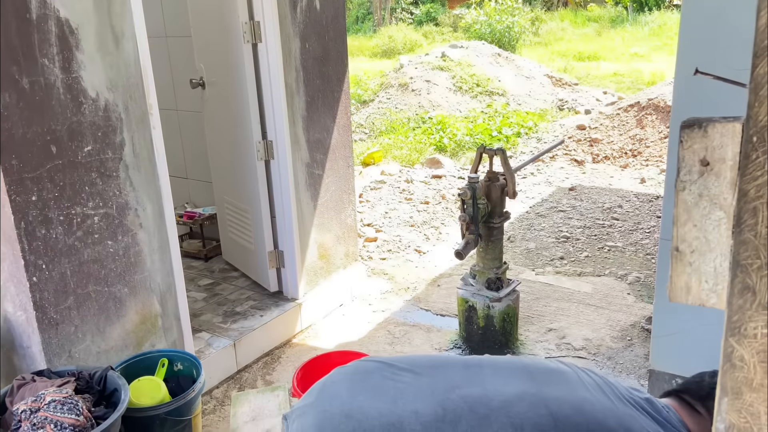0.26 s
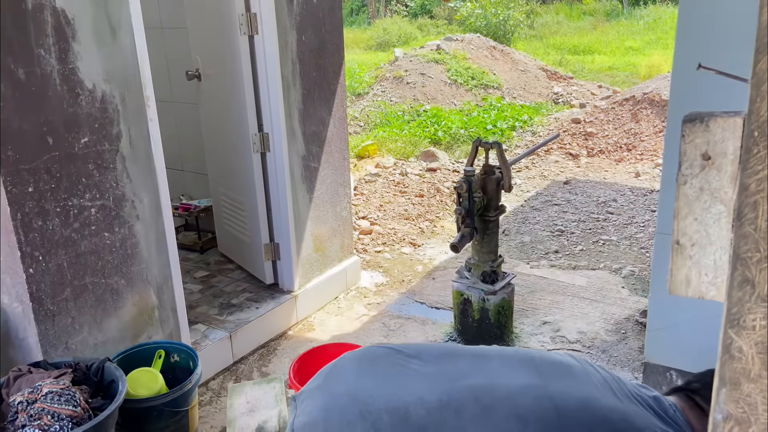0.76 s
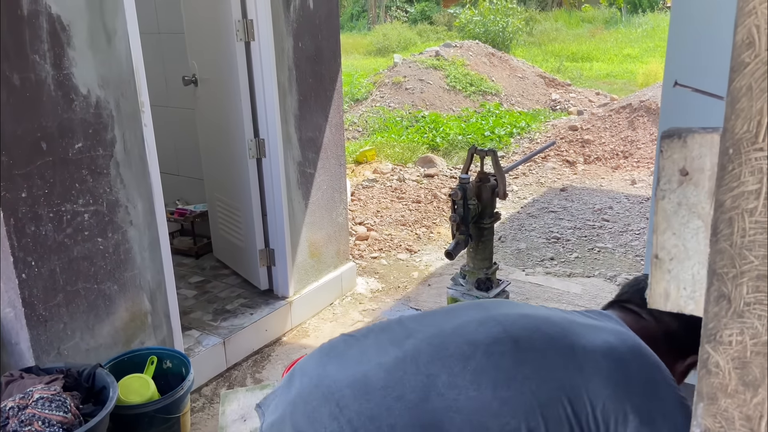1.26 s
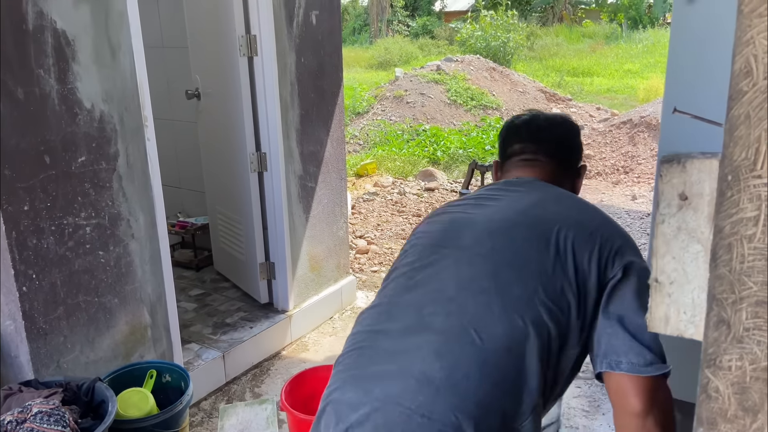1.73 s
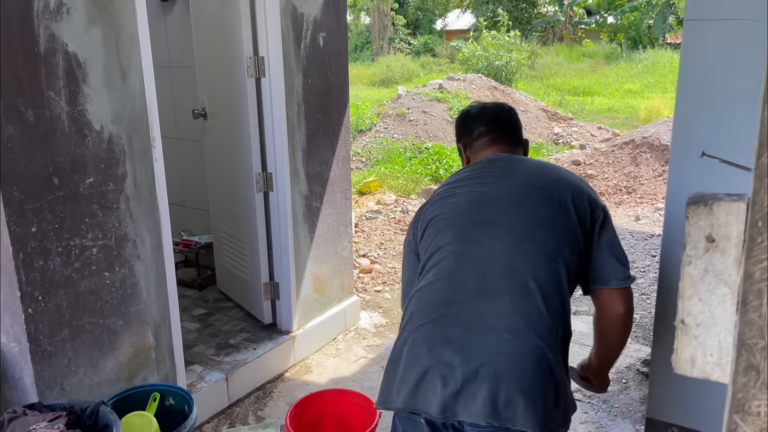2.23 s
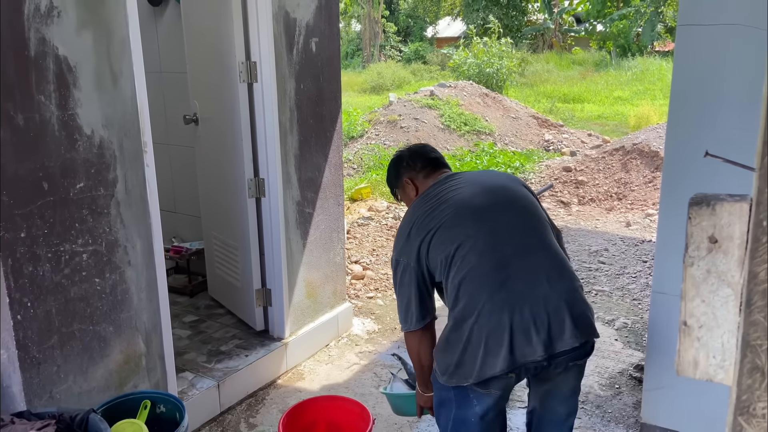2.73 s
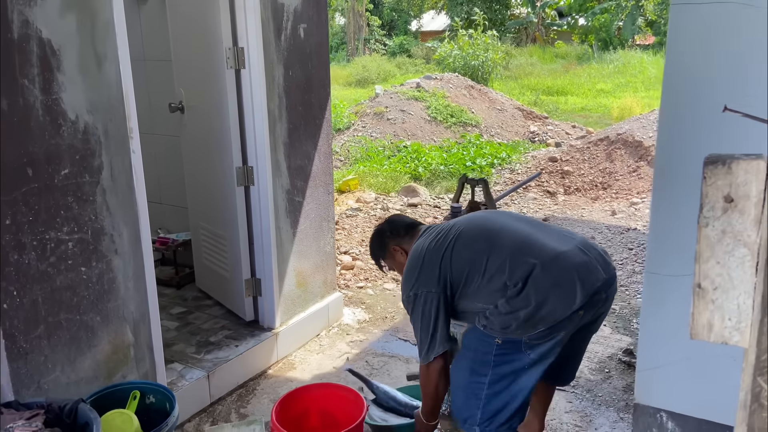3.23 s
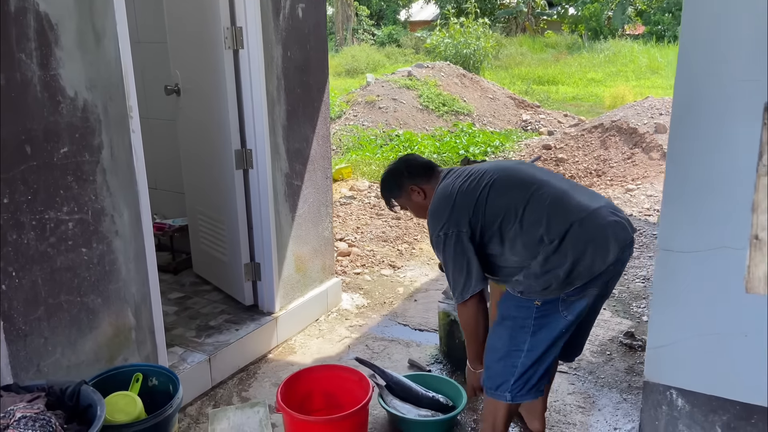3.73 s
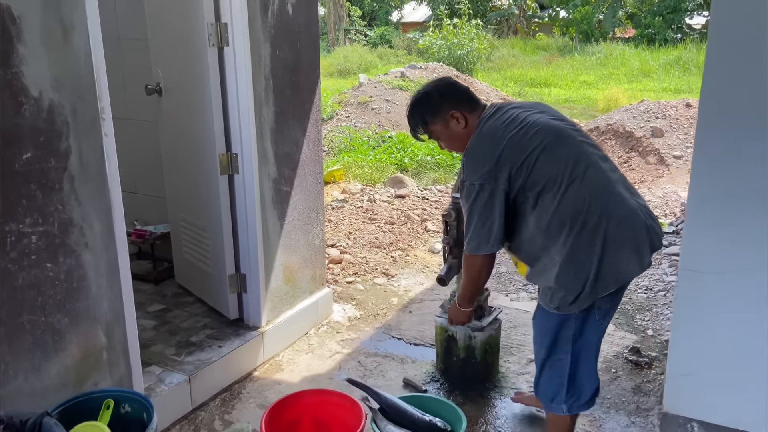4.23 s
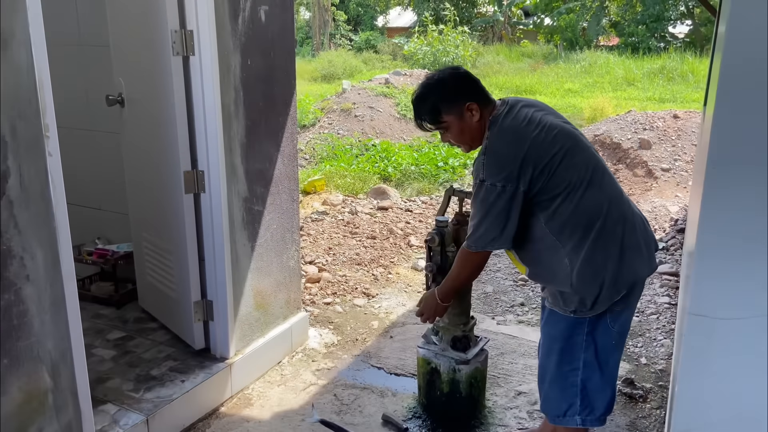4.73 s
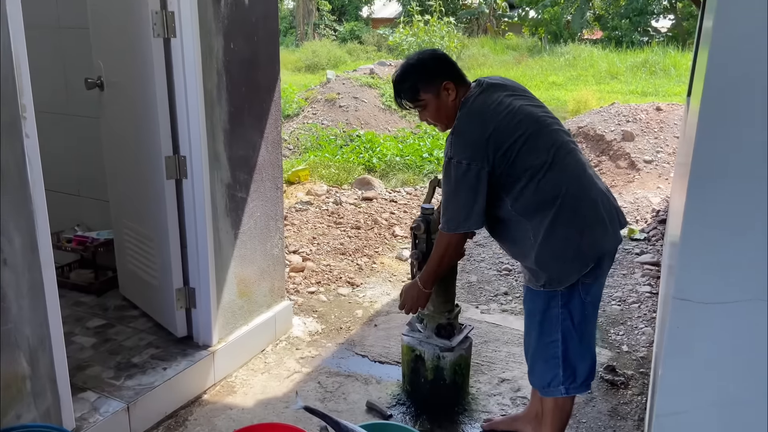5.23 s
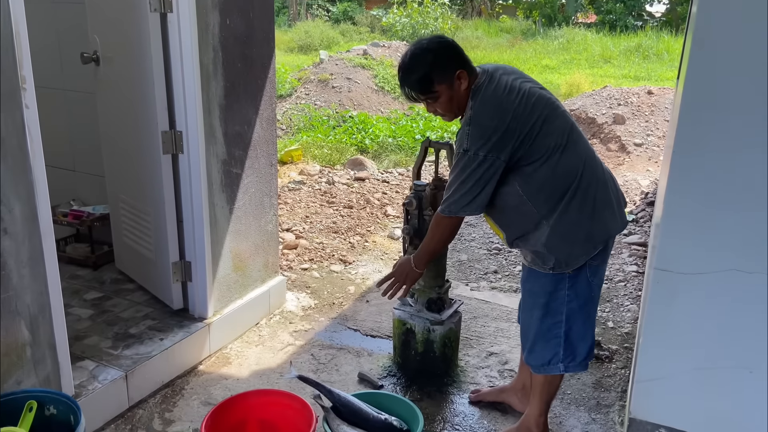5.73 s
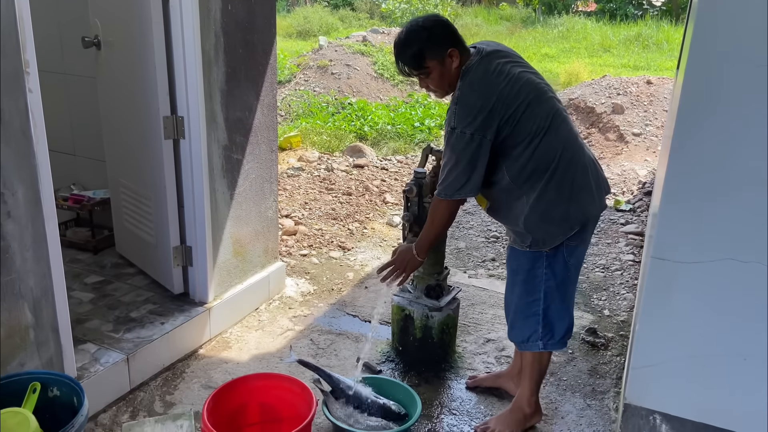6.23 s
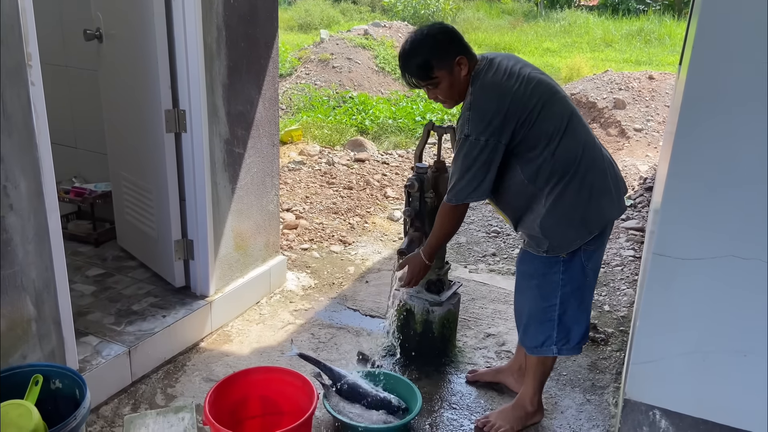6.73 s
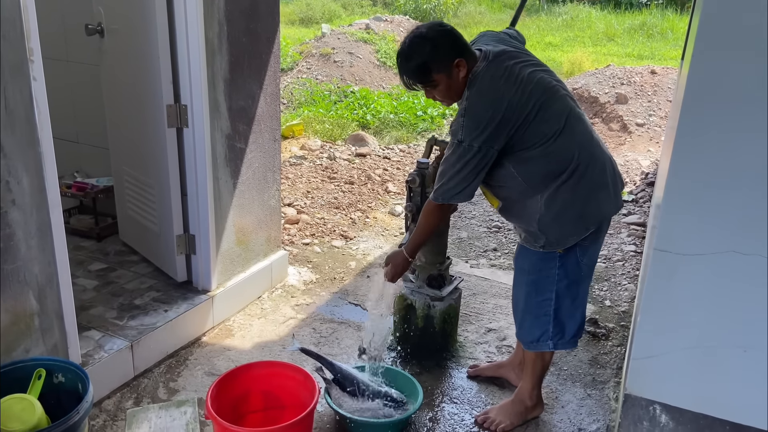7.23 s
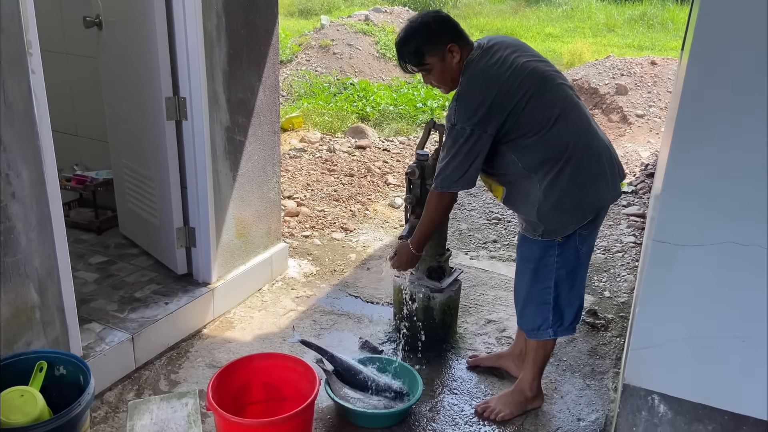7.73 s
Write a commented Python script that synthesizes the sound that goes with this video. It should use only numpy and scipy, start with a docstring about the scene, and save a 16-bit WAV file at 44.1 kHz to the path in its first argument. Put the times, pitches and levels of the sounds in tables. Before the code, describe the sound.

Chick peeps, a plastic basin knock and a skittering metal utensil give way to a clanking, squealing cast-iron hand pump gushing water onto concrete.

```python
"""A yard heard from a concrete porch: an engine drones far off throughout, two orders of its firing over rumble and hiss.
Wooden taps, scuffing feet and a nudged pot come first; chicks peep in arched whistles while birds call far off.
A plastic basin knocks its modes, a metal utensil skitters as grit keeps it ringing, a rooster crows in harmonics.
Then a cast-iron hand pump is worked: blows ring its linkage, gliding tones squeal and creak,
the barrel gulps in noise and bubbles, and water gushes onto the concrete in spray, slaps, drops and froth."""
import sys
import numpy as np
from scipy import signal
from scipy.fft import rfft, irfft, next_fast_len
from scipy.io import wavfile

SR = 44100
rng = np.random.default_rng(int(sys.argv[2]) if len(sys.argv) > 2 else 0)


def unload_audio(sound):
    """Save the sound as a 16-bit wav file, at the path given as the first command line argument."""
    columns = np.transpose(np.atleast_2d(sound))
    # keep every value between -1 and 1, then stretch to whole-number steps
    steps = np.round(np.clip(columns, -1, 1) * 32767)
    wavfile.write(sys.argv[1], SR, steps.astype(np.int16))


N = 351666
TIME = np.arange(N) / SR
SIDES = np.array([[1], [-1]])   # left, right

# Table levels are relative: each layer also has a gain of its own. t60 is the time to fall by 60 dB.
# iron striking iron in the linkage: [t/s, level/dB, ring over rattle/dB, brightness/(dB/octave), favoured mode f/Hz]
IRON_CLANKS = [(4.656, -30, -4.5, -2, 2820), (4.776, -33, -5, 5, 5490), (4.877, -19.5, 0, -2.5, 3750),
               (4.955, -19.5, -7, 2, 3750), (5.005, -33, -2, 6, 4030), (5.588, -12.5, -10.5, 1.5, 4430),
               (5.654, -20, -10, -2, 3750), (5.697, -17.5, -8.5, 10.5, 7170), (5.747, -17.5, -9, 2.5, 4430),
               (5.777, -20, -3.5, 8.5, 4430), (6.011, -21, 0, 2, 3750), (6.037, -14, -9.5, 2.5, 5950),
               (6.122, -18, -8, 7, 4430), (6.752, -28, 5, -1.5, 1370), (6.779, -15, -5.5, -0.5, 3750),
               (6.88, -18.5, -7, 2, 5490), (6.95, -17.5, -9, 7.5, 4820), (7.178, -17.5, -11, 3.5, 3750),
               (7.245, -16.5, -8.5, 4, 4430), (7.577, -20.5, -13.5, 2.5, 5490)]
# modes of the pump body: [f/Hz, level/dB, t60/s]
IRON_MODES = [(1370, -7, .2), (2030, -5, .14), (2610, -9, .12), (2820, -4, .17), (3000, -7, .2),
              (3640, -6, .1), (3748, -1, .11), (4030, -8, .1), (4430, -3, .15), (4820, -9, .14),
              (5490, -5, .12), (5950, -4, .18), (7170, -16, .08), (7710, -12, .15), (8450, -12, .13),
              (9500, -14, .12)]
# the casting's weaker modes: [f/Hz, level/dB]
WEAK_MODE_COLOUR = [(1100, -2.5), (3000, -9.5), (6000, 1), (7300, -65), (9000, 1), (12400, -33.5)]
# rattle of the loose linkage: [f/Hz, level/dB]
RATTLE_SPECTRUM = [(150, -11), (500, 10.5), (1400, 15.5), (2700, 16), (4300, 16.5), (6000, 11.5),
                   (8000, -2), (11500, -3), (15500, -48)]
IRON_CENTRE_HZ = 3750
RATTLE_T60_S, RATTLE_HALVES_DB = 0.12, 8   # a cleaner blow rattles less long: half the time per so many dB of ring
CONTACT_T60_S = 0.0054   # a blow takes a moment to set a thing ringing
# squeals of the dry pivot: [start t/s, end t/s, start f/Hz, end f/Hz, level/dB]
PIVOT_SQUEALS = [(5.026, 5.08, 11770, 11400, -24), (5.104, 5.185, 11460, 11320, -20.5),
                 (5.406, 5.468, 6517, 6050, -13), (5.452, 5.521, 3920, 3760, -18),
                 (6.411, 6.594, 6500, 6470, -14), (6.561, 6.635, 4240, 4000, -10),
                 (7.654, 7.746, 12120, 12150, -18.5), (7.789, 7.917, 4290, 3850, -8),
                 (7.896, 7.919, 6180, 6000, -21), (7.905, 7.992, 3570, 3080, -21.5)]
# creaks of the plunger rod under load: [start t/s, end t/s, start f/Hz, end f/Hz, level/dB]
ROD_CREAKS = [(4.675, 4.715, 2860, 2580, -28.5), (4.817, 4.848, 2620, 2530, -32),
              (4.957, 4.99, 4230, 4060, -21)]
# lumps of water and air pulled through the valve: [t/s, peak level/dB, t60/s]
VALVE_GULPS = [(4.62, -32, 0.99), (4.79, -22.5, 0.57), (5.0, -13, 0.34), (5.036, -21, 0.15),
               (5.56, -26.5, 0.3), (5.605, -23.5, 0.84), (5.78, -24.5, 0.99), (6.015, -17.5, 0.58),
               (6.125, -13, 0.33), (6.775, -17.5, 0.14), (6.928, -19.5, 0.22), (7.178, -18.5, 0.13),
               (7.236, -15.5, 0.26), (7.38, -19.5, 0.52), (7.55, -33, 0.31)]
# noise of the gulps: [f/Hz, level/dB]
GULP_SPECTRUM = [(100, -7), (195, 1), (270, -10.5), (370, 2.5), (600, 2), (1000, -6), (1500, -1.5),
                 (2400, -4.5), (4500, -5.5), (10000, -30)]
# big air pockets bursting in the barrel and the basin: [t/s, f/Hz, level/dB]
AIR_PLOPS = [(4.92, 366, -14), (4.998, 392, -13.5), (5.04, 208.7, -17.5), (5.603, 580, -11.5),
             (6.013, 373, -15.5), (6.116, 350, -14), (6.773, 570, -9), (6.928, 623, -14.5),
             (7.174, 420, -11.5), (7.177, 687, -5), (7.577, 2060, -2), (7.625, 723, -8.5), (7.72, 570, -16),
             (7.778, 1045, -9), (7.794, 766, -15)]
PLOP_CYCLES, PLOP_RISE = 23, 0.036   # starting-pitch cycles until gone; pitch climbs by twice this share
PUMPING_STARTS_S, GULP_SWELL_DB_PER_S = 4.55, 730
# gushes over the steady stream: [t/s, peak level/dB]
SPOUT_GUSHES = [(6.138, -17.5), (6.53, -24.5), (6.79, -22.5), (7.16, -20.5), (7.58, -18.5)]
GUSH_SWELL_DB_PER_S, GUSH_T60_S = 50, 0.73
STREAM_STARTS_S, STREAM_OPENS_S, STREAM_DB = 5.97, 0.13, -29.5   # steady once the barrel is full
# clumps of water slapping the concrete: [t/s, level/dB, brightness/(dB/octave)]
WATER_SLAPS = [(6.221, -13.5, -5), (6.387, -16, 3), (6.485, -12.5, -5), (6.505, -10, -3), (6.553, -17, 2),
               (7.076, -10.5, -1), (7.429, -13, 0), (7.515, -13, -4), (7.545, -15, -9.5), (7.65, -10, 0.5),
               (7.754, -8, 0.5), (7.912, -17, 4)]
# noise of the splashes: [f/Hz, level/dB]
SPLASH_SPECTRUM = [(200, -1.5), (400, -32), (800, -37), (1500, -0.5), (3000, 8), (5000, 8.5), (7000, -2.5),
                   (9000, 5), (12000, 1), (14000, -10), (15500, -20)]
SPLAT_CENTRE_HZ, SPLAT_T60_S = 3500, 0.091
# plastic basin bumped and set down: [t/s, level/dB, t60/s, brightness/(dB/octave)]
BASIN_KNOCKS = [(3.121, -11.5, 0.07, 3), (3.128, -8.5, 0.045, 1), (3.155, -18, 0.051, -2),
                (3.248, -19.5, 0.14, -3.5), (3.279, -24, 0.14, -0.5), (3.369, -22, 0.07, 2)]
# modes of the basin: [f/Hz, level/dB, t60/s]
BASIN_MODES = [(173, 0, 0.082), (357, -9, 0.079), (579, -3.5, 0.067), (659, 1, 0.11), (775, -3, .09),
               (890, -8, 0.053), (1210, -1, 0.072), (2065, -2.5, 0.051), (3350, -17, 0.032)]
# hollow wooden taps, the second with a short clatter: [t/s, level/dB, t60/s, brightness/(dB/octave)]
WOOD_TAPS = [(.029, -24, 0.18, -2.5), (.136, -22, 0.12, -1), (.176, -28, 0.14, -1),
             (.196, -30.5, 0.18, -1.5)]
# modes of the wood: [f/Hz, level/dB, t60/s]
WOOD_MODES = [(305, -11, 0.052), (570, -5.5, 0.077), (1026, 6.5, 0.021), (1256, 8.5, 0.016),
              (2030, -4.5, 0.045)]
# a pot is nudged and rocks: [t/s, level/dB, t60/s, brightness/(dB/octave)]
POT_CLINKS = [(.692, -21.5, 0.12, 1.5), (.702, -26.5, 0.062, 3.5), (.716, -30, 0.048, -1)]
# modes of the pot: [f/Hz, level/dB, t60/s]
POT_MODES = [(763, 6, 0.16), (1395, 2, 0.062), (2040, -2, 0.084), (2816, -2.5, 0.16), (3430, -6, 0.084),
             (3795, -7.5, 0.079), (4457, -20, 0.13)]
# dull contact noise of knocks: [f/Hz, level/dB]
CONTACT_SPECTRUM = [(160, -3), (250, -3), (400, -9.5), (700, -6.5), (1200, -8), (2100, -15.5), (3000, -17),
                    (4500, -17.5), (7000, -30.5), (10000, -30.5), (15000, -51)]
# a metal utensil is dropped and skitters: [t/s, level/dB, t60/s, ring over scrape/dB]
UTENSIL_SKITTERS = [(3.5, -7.5, 0.041, -7), (3.51, -16.5, 0.2, -1.5), (3.6, -21, 0.11, 1),
                    (3.647, -31, 0.14, 10), (3.682, -32, 0.18, 5.5), (3.768, -33, 0.25, -9),
                    (3.803, -33, 0.11, -11)]
# modes of the blade: [f/Hz, level/dB, t60/s of the free ring, halved by the grit]
BLADE_MODES = [(2820, -11, 0.11), (3820, 8.5, 0.091), (4060, 12.5, 0.1), (4230, 10, 0.07),
               (4350, 11.5, 0.081), (5300, -6, .04), (5530, 7, 0.046)]
# scrape of the utensil: [f/Hz, level/dB]
SCRAPE_SPECTRUM = [(200, 1.5), (500, -3), (1000, 4), (2000, -5.5), (3000, 4), (4200, -6), (5500, 5),
                   (7500, -6), (10000, 0), (13000, -8), (15500, -32)]
# feet scuffing: [t/s, level/dB, t60/s]
FOOT_SCUFFS = [(.467, -33.5, 0.27), (1.618, -18, 0.025), (1.732, -27.5, 0.17), (2.214, -32, 0.23),
               (2.28, -31.5, 0.18), (2.526, -24, 0.12), (3.0, -26.5, 0.079), (4.117, -24, 0.065)]
# grit under the feet: [f/Hz, level/dB]
GRIT_SPECTRUM = [(200, -4), (1000, 3), (3000, 7.5), (5500, 9.5), (8500, 6.5), (12000, 4), (15500, -15)]
# chicks: [t/s, length/s, start f/Hz, top f/Hz, end f/Hz, share of the call before its top, level/dB]
CHICK_PEEPS = [(0.746, 0.043, 4870, 6530, 6100, 0.49, -39), (0.924, 0.038, 5040, 6220, 5760, 0.48, -33),
               (1.114, 0.039, 4800, 5840, 5600, 0.65, -35), (1.307, 0.094, 5560, 6760, 6130, 0.28, -36),
               (1.554, 0.063, 4850, 5900, 5030, 0.46, -30), (1.797, 0.082, 5300, 7050, 5800, 0.22, -22),
               (2.061, 0.085, 4720, 6050, 5200, 0.3, -29), (2.335, 0.092, 6100, 6850, 5770, 0.25, -51),
               (2.677, 0.068, 5950, 6500, 5670, 0.28, -42), (2.88, 0.063, 5000, 6100, 5350, 0.46, -38),
               (2.953, 0.075, 5300, 5860, 5100, 0.23, -35)]
PEEP_ECHO_DB = -38.5
# a distant rooster's crow: [t/s, f/Hz, level/dB]
CROW_CURVE = [(3.84, 367, -55), (4.02, 415.4, -41.5), (4.12, 428, -53), (4.33, 427.3, -47.5),
              (4.46, 416, -50.5), (4.6, 390, -46)]
# resonance of the rooster's throat: [f/Hz, level/dB]
THROAT_SPECTRUM = [(420, -14), (840, -10), (1680, -2), (2100, -12), (2520, -12), (3360, -0.5), (3800, -7.5),
                   (4650, -6)]
# birds calling far off: [start t/s, end t/s, start f/Hz, end f/Hz, level/dB]
FAR_BIRD_CALLS = [(1, 1.12, 3760, 3470, -50), (1.38, 1.56, 3600, 4080, -47), (1.11, 1.27, 2390, 2340, -45),
                  (2.1, 2.8, 2420, 2350, -50.5)]
# distant engine slowly gathering speed: [t/s, firing f/Hz]
ENGINE_FIRING = [(0, 53.58), (1.1, 56.63), (3.1, 60.25), (5.6, 60.95), (7.97, 66.68)]
# loudness of the engine: [t/s, fundamental level/dB, octave level/dB]
ENGINE_LEVELS = [(0, -25, -33), (1.2, -24, -35), (1.4, -19, -28.5), (2.1, -15.5, -28), (2.6, -21, -27),
                 (3.05, -23, -22), (3.65, -26.5, -36), (4.75, -21.5, -31), (5.55, -22, -31.5),
                 (5.72, -35, -45), (6.05, -33, -34), (6.3, -19, -27.5), (6.85, -24.5, -28.5),
                 (7.62, -16, -20.5), (7.97, -27, -31.5)]
# low rumble: [f/Hz, level/dB]
RUMBLE_SPECTRUM = [(20, -66), (36, -69), (50, -13), (70, -6.5), (84, 4), (100, -14), (125, -11.5),
                   (150, -16.5), (200, -78), (400, -55.5)]
# hiss of the fields: [f/Hz, level/dB]
AIR_SPECTRUM = [(170, -0.5), (250, -3), (450, -3.5), (800, -5.5), (1300, -14), (2500, -19.5), (4500, -16),
                (6000, -73), (8300, -7), (9500, -42), (13000, -68), (15500, -70)]
# decay of the porch: [f/Hz, t60/s]
PORCH_DECAY = [(150, 0.68), (700, 0.33), (3000, 0.41), (7000, 0.38), (15000, 0.29)]
# width of the porch echo: [f/Hz, side minus mid level/dB]
PORCH_WIDTH = [(150, -2), (700, 2), (2500, 1), (4500, -5), (12000, -7)]
# phase by which the left microphone leads: [f/Hz, lead/rad]
LEFT_LEAD = [(20, 0), (250, 0), (700, 1.4), (1800, .8), (3300, 1.5), (4500, 1.4), (5300, .4), (7300, 3.14),
             (8300, 3.8), (9700, 6.28), (11600, 6.28), (12800, 9.2), (15000, 9.6), (16000, 12)]
# balance of the microphone pair: [f/Hz, left minus right level/dB]
LEFT_OVER_RIGHT = [(60, -1), (110, -3.5), (200, -3.5), (380, -8.5), (700, -5), (1290, 1), (2380, 0.0),
                   (4400, -1.5), (8120, 0.5), (15000, -1)]
CUTOFF_HZ = 15650


def from_db(db):
    """Amplitude of a level in dB."""
    return np.exp(np.asarray(db) * (np.log(10) / 20))


def rms_one(x):
    """Scale to rms 1."""
    return x / np.sqrt(np.mean(x ** 2) + 1e-20)


def decay(t, t60):
    """Exponential fade, 60 dB down at t60."""
    return np.exp(-np.log(1000) * t / t60)


def in_time(rows):
    """Each column of a curve, at every sample."""
    s, *columns = np.transpose(rows)
    return [np.interp(TIME, s, c) for c in columns]


def at_hz(points, hz):
    """Read a table on a log-frequency axis."""
    table_hz, values = np.array(points).T
    return np.interp(np.log(np.maximum(hz, 1)), np.log(table_hz), values)


def drift(rate):
    """Smooth chance joining `rate` random points a second; rms 1."""
    knots = rng.standard_normal(4096)
    return rms_one(np.interp(TIME * rate, np.arange(len(knots)), knots))


def colour(x, spectrum):
    """Give a steady signal a spectrum; rms 1."""
    size = next_fast_len(N)
    hz = np.arange(size // 2 + 1) * SR / size
    return rms_one(irfft(rfft(x, size) * from_db(at_hz(spectrum, hz)), size)[..., :N])


def octaves(x):
    """Split a steady signal into octaves, the outer two open-ended: pairs (centre Hz, band)."""
    size = next_fast_len(N)
    spectrum, hz = rfft(x, size), np.arange(size // 2 + 1) * SR / size
    octave = np.clip(np.round(np.log2(np.maximum(hz, 1) / 1000)), -1, 3)
    return [(1000 * 2. ** k, irfft(spectrum * (octave == k), size)[:N]) for k in range(-1, 4)]


def lumpy(x, lump_db, rate):
    """Every octave swells and fades by itself; rms 1."""
    return rms_one(sum(band * from_db(lump_db * drift(rate)) for _, band in octaves(x)))


def grains(per_s, spread_db):
    """Random clicks of uneven size."""
    sizes = from_db(spread_db * np.minimum(rng.exponential(1, N), 5)) * rng.choice([-1, 1], N)
    return sizes * (rng.random(N) < per_s / SR)


def bursts(rows, rise_s):
    """Envelope of quick starts that die away; rows [t/s, level/dB, t60/s]."""
    power = np.zeros(N)
    for s, level_db, t60 in rows:
        at = int(s * SR)
        span = TIME[:min(N - at, int(t60 * SR))]
        rise = np.minimum(span / rise_s, 1)
        power[at:at + len(span)] += from_db(level_db) ** 2 * rise * decay(span, t60) ** 2
    return np.sqrt(power)


def bright_bursts(noise, s, level_db, t60, tilt_db, centre_hz, rise_s):
    """Noise bursts, each tilted brighter or duller about the centre by its dB per octave."""
    out = np.zeros(N)
    for hz, band in octaves(noise):
        band_db = level_db + tilt_db * np.log2(hz / centre_hz)
        out += band * bursts(zip(s, band_db, t60), rise_s)
    return out


def surges(rows, swell_db_per_s):
    """Envelope of flows that swell to a peak and ebb away; rows [t/s, level/dB, t60/s]."""
    t, power = TIME[::32], 0
    for s, level_db, t60 in rows:
        slope_db = np.minimum(swell_db_per_s * (t - s), -60 * (t - s) / t60)
        power = power + from_db(level_db + slope_db) ** 2
    return np.interp(TIME, t, np.sqrt(power))


def ring(clicks, hz, t60):
    """A resonator: a unit click sets a sine of height about 1 ringing."""
    r, w = decay(1 / SR, t60), 2 * np.pi * hz / SR
    return signal.lfilter([0, np.sin(w)], [1, -2 * r * np.cos(w), r * r], clicks + 1e-18)


def strike(rows, modes, tilt_db, centre_hz):
    """Every blow rings every mode by chance more or less; its own brightness tilts the modes about the centre."""
    s, level_db = np.transpose(rows)[:2]
    chance_db = 2.5 * rng.standard_normal((len(s), len(modes)))
    out = np.zeros(N)
    for k, (hz, mode_db, t60) in enumerate(modes):
        t = TIME[:int(t60 * SR)]
        tone = np.sin(2 * np.pi * hz * t) * (decay(t, t60) - decay(t, CONTACT_T60_S))
        strengths = from_db(level_db + mode_db + tilt_db * np.log2(hz / centre_hz) + chance_db[:, k])
        for at, strength in zip((s * SR).astype(int), strengths):
            out[at:at + len(tone)] += strength * tone[:N - at]
    return out


def glides(rows, attack_s, release_s, waver, octave_db):
    """Nearly pure, slightly unsteady tones that slide from one pitch to another."""
    out, wobble = np.zeros(N), 1 + waver * drift(250)
    for start, end, start_hz, end_hz, level_db in rows:
        on = (TIME > start) & (TIME < end)
        t = TIME[on]
        hz = np.interp(t, [start, end], [start_hz, end_hz]) * wobble[on]
        phase = 2 * np.pi * np.cumsum(hz) / SR
        swell = np.clip(np.minimum((t - start) / attack_s, (end - t) / release_s), 0, 1)
        octave = from_db(octave_db) * np.sin(2 * phase) * (start_hz < SR / 4)   # no aliasing
        out[on] += from_db(level_db) * swell * (np.sin(phase) + octave)
    return out


def bubbles(level, per_s, low_hz, high_hz, cycles, rise, count=2000):
    """Trapped air rings and rises in pitch; each bubble's loudness follows the flow at its birth and its own chance."""
    out, draws = np.zeros(N), rng.random((count, 3))
    births = PUMPING_STARTS_S - np.cumsum(np.log(1 - draws[:, 0])) / per_s
    for s, (_, size, strength) in zip(births, draws):
        at, hz = int(s * SR), low_hz * (high_hz / low_hz) ** size
        if at >= N:
            break
        life = cycles / hz
        t = TIME[:min(int(life * SR), N - at)]
        fade = strength ** 2 * decay(t, life)
        out[at:at + len(t)] += level[at] * fade * np.sin(2 * np.pi * hz * t * (1 + rise * t / life))
    return out


def linkage(crowd_db=-19.0, crowd_t60=0.19, favoured_t60=0.1):
    """Loose pins chatter at every blow and ring the casting; the point of contact favours one mode."""
    s, level_db, ring_db, tilt_db, favoured_hz = np.transpose(IRON_CLANKS)
    t60 = RATTLE_T60_S * 2 ** (-ring_db / RATTLE_HALVES_DB)
    rattle = colour(grains(1800, spread_db=2.5), RATTLE_SPECTRUM)
    chatter = bright_bursts(rattle, s, level_db, t60, tilt_db, IRON_CENTRE_HZ, rise_s=0.0098)

    ringing = np.column_stack([s, level_db + ring_db])   # a clean blow rings more than it rattles
    main = strike(ringing, IRON_MODES, tilt_db, IRON_CENTRE_HZ)
    weak_hz = np.geomspace(1100, 12400, 44) * rng.uniform(.98, 1.02, 44)
    weak_modes = [(hz, crowd_db + at_hz(WEAK_MODE_COLOUR, hz), crowd_t60) for hz in weak_hz]
    crowd = strike(IRON_CLANKS, weak_modes, tilt_db, IRON_CENTRE_HZ)
    casting = from_db(-3.5) * chatter + from_db(-1) * main + crowd

    favoured = np.zeros(N)
    for blow, wanted_hz in zip(ringing, favoured_hz):
        hz = min(IRON_MODES, key=lambda mode: abs(mode[0] - wanted_hz))[0]
        favoured += strike([blow], [(hz, 0, favoured_t60)], 0, hz)
    return from_db(7.0) * casting + from_db(11.0) * favoured


def pivot(flutter_db=2.5):
    """Stick-slip: the dry pivot squeals, mostly sagging as the handle slows; the loaded rod creaks roughly."""
    squeals = glides(PIVOT_SQUEALS, attack_s=0.0084, release_s=0.0047, waver=0.004, octave_db=-16.0)
    creaks = glides(ROD_CREAKS, attack_s=0.0041, release_s=0.011, waver=0.011, octave_db=-10)
    return squeals * from_db(flutter_db * drift(90)) + creaks * from_db(3 * drift(300))


def barrel():
    """Suction pulls water through in lumps of noise and glugging bubbles, with big plops of air."""
    suction = surges(VALVE_GULPS, GULP_SWELL_DB_PER_S)
    gulp = suction * lumpy(colour(grains(1500, spread_db=2.0), GULP_SPECTRUM), lump_db=2.5, rate=60)
    glugs = bubbles(suction, per_s=170, low_hz=260, high_hz=2400, cycles=13, rise=0.08)
    return gulp + from_db(5.0) * glugs + from_db(2.0) * plops()


def plops(onset_s=0.0044):
    """Each big air pocket rings briefly, rising in pitch."""
    out = np.zeros(N)
    for s, hz, level_db in AIR_PLOPS:
        at, life = int(s * SR), PLOP_CYCLES / hz
        t = TIME[:min(int(life * SR), N - at)]
        fade = np.minimum(t / onset_s, 1) * decay(t, life)
        out[at:at + len(t)] += from_db(level_db) * fade * np.sin(2 * np.pi * hz * t * (1 + PLOP_RISE * t / life))
    return out


def spout():
    """A steady stream and its gushes break into spray, drops and bubbles on the floor."""
    gushes = surges([(s, db, GUSH_T60_S) for s, db in SPOUT_GUSHES], GUSH_SWELL_DB_PER_S)
    opening = np.clip((TIME - STREAM_STARTS_S) / STREAM_OPENS_S, 0, 1)
    flow = np.hypot(from_db(STREAM_DB), gushes) * opening
    spray = flow * lumpy(colour(grains(1400, spread_db=0.5), SPLASH_SPECTRUM), lump_db=4.0, rate=55)
    drops = flow * droplets(per_s=260, spread_db=3, cycles=30)
    froth = bubbles(flow, per_s=420, low_hz=380, high_hz=5200, cycles=17, rise=0.05)
    return spray + from_db(-7) * drops + from_db(-2.5) * froth


def slaps():
    """Clumps of water slap the concrete in short bursts of spatter."""
    s, level_db, tilt_db = np.transpose(WATER_SLAPS)
    t60 = np.full(len(s), SPLAT_T60_S)
    spatter = colour(grains(2500, spread_db=0.5), SPLASH_SPECTRUM)
    return bright_bursts(spatter, s, level_db, t60, tilt_db, SPLAT_CENTRE_HZ, rise_s=0.0035)


def droplets(per_s, spread_db, cycles, count=24):
    """Single drops of uneven size, each a tick that rings for some cycles at its own pitch; rms 1."""
    pitches = np.geomspace(900, 6300, count)
    return rms_one(sum(ring(grains(per_s / count, spread_db), hz, cycles / hz) for hz in pitches))


def chores():
    """Things are picked up and set down; feet scuff on gritty concrete."""
    basin = knock(BASIN_KNOCKS, BASIN_MODES, ring_db=-6.0)
    wood = knock(WOOD_TAPS, WOOD_MODES, ring_db=2.5)
    pot = knock(POT_CLINKS, POT_MODES, ring_db=-5.5)
    steps = bursts(FOOT_SCUFFS, rise_s=.012) * colour(grains(5000, spread_db=2.0), GRIT_SPECTRUM)
    return basin + wood + pot + utensil() + steps


def knock(rows, modes, ring_db):
    """A dull contact noise and the ring of the thing that is hit, brighter or duller by each contact's own value."""
    s, level_db, t60, tilt_db = np.transpose(rows)
    centre_hz = 1000
    noise = colour(grains(8000, spread_db=2.5), CONTACT_SPECTRUM)
    contact = bright_bursts(noise, s, level_db, t60, tilt_db, centre_hz, rise_s=0.0043)
    return contact + from_db(ring_db) * strike(rows, modes, tilt_db, centre_hz)


def utensil():
    """Grit catches the sliding blade many times a second and keeps it ringing, now on one mode, now on another."""
    s, level_db, t60, ring_db = np.transpose(UTENSIL_SKITTERS)
    catches = grains(900, spread_db=3)
    blade = np.zeros(N)
    for hz, mode_db, free_t60 in BLADE_MODES:
        blade += from_db(mode_db + 5.3 * drift(40)) * ring(catches, hz, free_t60 / 2)
    scrape = colour(grains(5000, spread_db=3.5), SCRAPE_SPECTRUM)
    scraping = scrape * bursts(zip(s, level_db, t60), rise_s=0.0019)
    ringing = rms_one(blade) * bursts(zip(s, level_db + ring_db, t60), rise_s=0.0057)
    return from_db(0.5) * scraping + from_db(5.5) * ringing


def chicks(levels_db, waver=0.0055):
    """Each peep is one quavering whistle that arches up to its top and sinks back."""
    out, quaver = np.zeros(N), 1 + waver * drift(500)
    for (s, length, start_hz, top_hz, end_hz, rising, _), level_db in zip(CHICK_PEEPS, levels_db):
        at, along = int(s * SR), np.linspace(0, 1, int(length * SR))
        turn = np.interp(along, [0, np.clip(rising, .1, .9), 1], [0, np.pi / 2, np.pi])   # top at pi / 2
        climb_hz = start_hz + (top_hz - start_hz) * np.sin(turn)
        sink_hz = end_hz + (top_hz - end_hz) * np.sin(turn) ** 4
        hz = np.where(turn < np.pi / 2, climb_hz, sink_hz)
        phase = 2 * np.pi * np.cumsum(hz * quaver[at:at + len(along)]) / SR
        out[at:at + len(hz)] += from_db(level_db) * np.sqrt(4 * along * (1 - along)) * np.sin(phase)
    return out


def rooster(waver=0.0061, count=11):
    """One long, slightly unsteady crow: a stack of harmonics shaped by the throat."""
    hz, level_db = in_time(CROW_CURVE)
    on, out = (TIME > CROW_CURVE[0][0]) & (TIME < CROW_CURVE[-1][0]), np.zeros(N)
    hz = (hz * (1 + waver * drift(60)))[on]
    phase = 2 * np.pi * np.cumsum(hz) / SR
    for k in range(1, count + 1):
        out[on] += from_db(level_db[on] + at_hz(THROAT_SPECTRUM, k * hz)) * np.sin(k * phase)
    return out


def far_birds(flutter_db=4):
    """Hoarse, broken calls that slide a little in pitch as their level flutters."""
    calls = glides(FAR_BIRD_CALLS, attack_s=.04, release_s=.04, waver=.014, octave_db=-20)
    return calls * from_db(flutter_db * np.tanh(drift(70)))


def engine(first_db=-3.0, second_db=-1.5, throb_db=1.5):
    """Only the two lowest orders of the exhaust carry this far, throbbing over a steady rumble."""
    hz, = in_time(ENGINE_FIRING)
    low_db, high_db = in_time(ENGINE_LEVELS)
    phase = 2 * np.pi * np.cumsum(hz * (1 + 0.00757 * drift(12))) / SR
    first = from_db(low_db + first_db) * np.sin(phase)
    second = from_db(high_db + second_db) * np.sin(2 * phase)
    orders = np.sqrt(2) * (first + second)
    rumble = colour(rng.standard_normal(N), RUMBLE_SPECTRUM)
    return orders * from_db(throb_db * drift(9.1)) + from_db(-25.0) * rumble


def outdoors(air_db=-39, apart_db=-9):
    """Soft, swaying noise of the fields, mostly alike at both sides."""
    mid, side = colour(rng.standard_normal((2, N)), AIR_SPECTRUM)
    sway_db = 1.2 * drift(6)
    return from_db(air_db + sway_db) * (mid + from_db(apart_db) * side * SIDES)


def porch(x, wet_db, first_s=0.0064):
    """Close concrete walls add a dense tail that lasts longest in the bass; the total power is roughly kept."""
    t, edges = TIME[:SR // 2], np.geomspace(100, 16000, 9)
    white, echo = rng.standard_normal((len(edges), 2, len(t))), 0
    for low, high, noise in zip(edges, edges[1:], white):
        band = signal.butter(2, [low, high], "band", fs=SR, output="sos")
        mid, side = signal.sosfilt(band, noise)
        hz = np.sqrt(low * high)
        apart = from_db(at_hz(PORCH_WIDTH, hz))
        pair = (mid + apart * side * SIDES) / np.hypot(1, apart)
        echo = echo + pair * decay(t, at_hz(PORCH_DECAY, hz)) * (t > first_s)
    echo = echo * from_db(wet_db) / np.sqrt(np.sum(echo ** 2) / 2)
    wet = signal.fftconvolve(x[None], echo, axes=1)[:, :N]
    return (x + wet) / np.sqrt(1 + from_db(wet_db) ** 2)


def scene():
    """Pump and chores sound close to the porch walls; far things reach it with more echo."""
    water = barrel() + from_db(-3.5) * slaps() + spout()
    pump = porch(linkage() + water + from_db(3.0) * pivot(), wet_db=-6.5)
    work = porch(chores(), wet_db=-4.5)
    # every peep echoes alike, so the fainter, farther ones are mostly echo
    direct_peeps = from_db(-2.5) * chicks([row[-1] for row in CHICK_PEEPS])
    peep_echoes = porch(chicks([PEEP_ECHO_DB] * len(CHICK_PEEPS)), wet_db=20)
    far = porch(rooster() + far_birds(), wet_db=-2)
    return pump + work + direct_peeps + peep_echoes + far + engine() + outdoors()


def record(dry):
    """The two microphone ports differ in phase and level; peaks are rounded, the top is cut."""
    size = next_fast_len(N + SR // 4)
    hz = np.arange(size // 2 + 1) * SR / size
    halves = SIDES / 2   # each side takes half the difference
    ports = from_db(halves * at_hz(LEFT_OVER_RIGHT, hz)) * np.exp(1j * halves * at_hz(LEFT_LEAD, hz))
    heard = irfft(rfft(dry, size) * ports, size)[:, :N]
    rounded = heard / (1 + heard ** 6) ** (1 / 6)
    return signal.sosfilt(signal.ellip(10, .1, 80, CUTOFF_HZ, fs=SR, output="sos"), rounded)


dry = scene()
out = record(dry)
unload_audio(out)
```